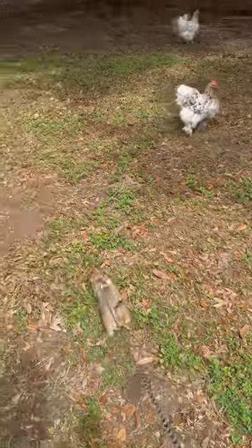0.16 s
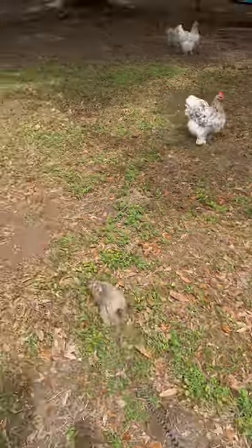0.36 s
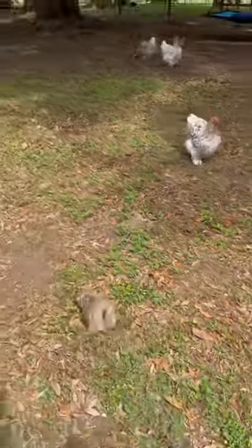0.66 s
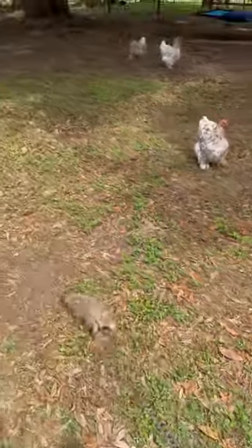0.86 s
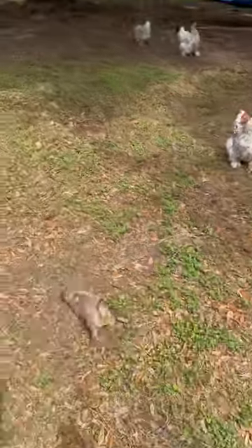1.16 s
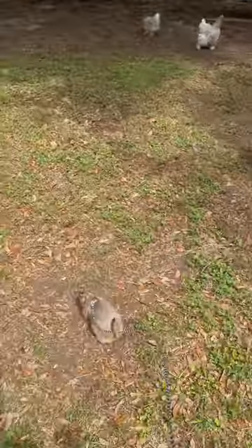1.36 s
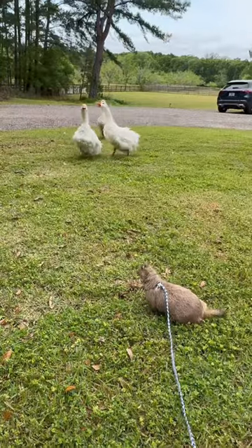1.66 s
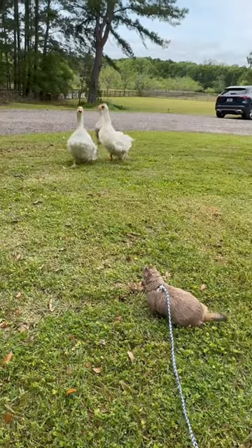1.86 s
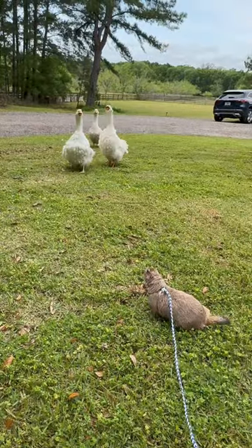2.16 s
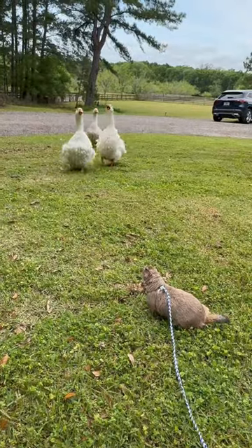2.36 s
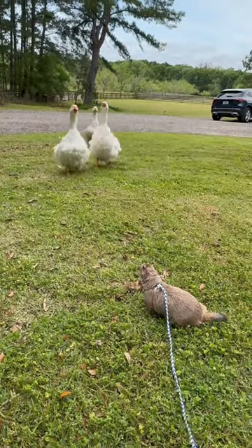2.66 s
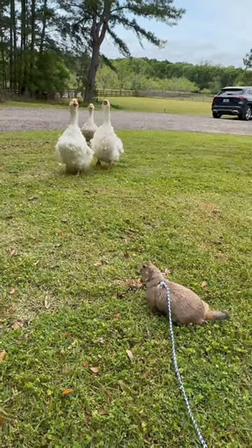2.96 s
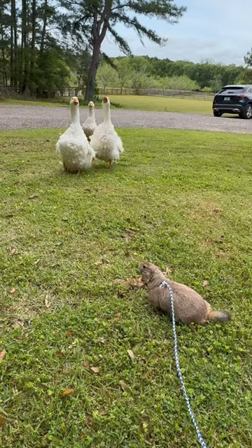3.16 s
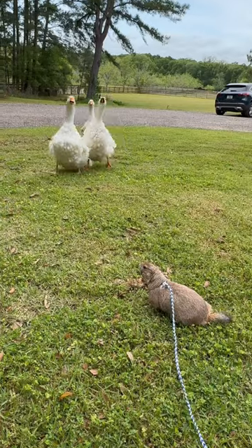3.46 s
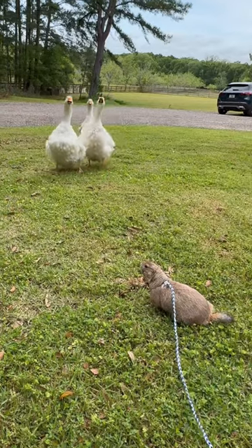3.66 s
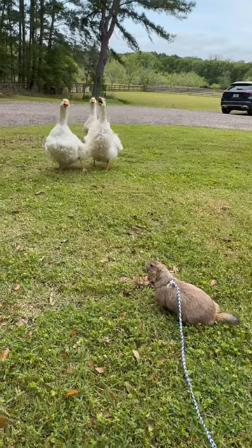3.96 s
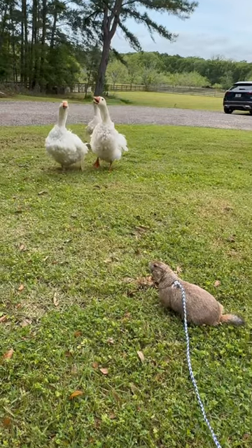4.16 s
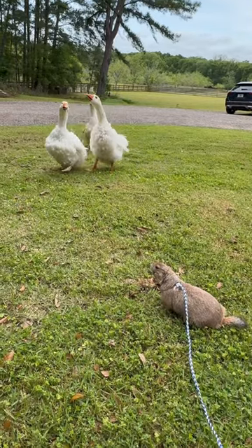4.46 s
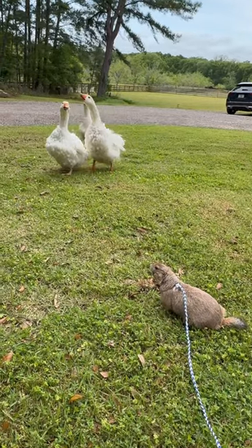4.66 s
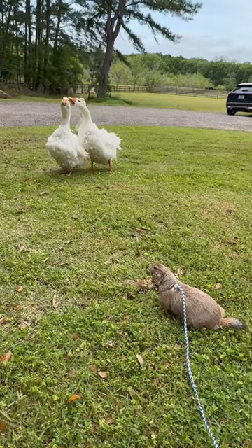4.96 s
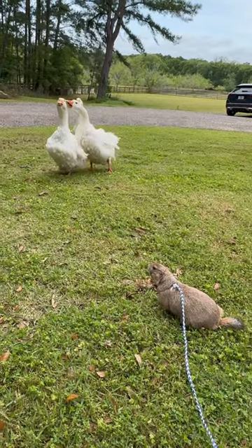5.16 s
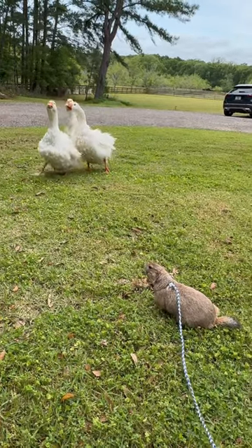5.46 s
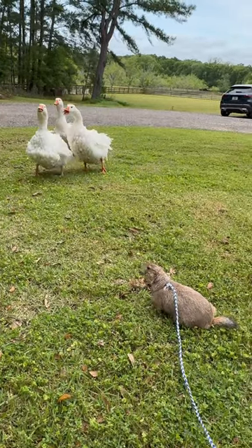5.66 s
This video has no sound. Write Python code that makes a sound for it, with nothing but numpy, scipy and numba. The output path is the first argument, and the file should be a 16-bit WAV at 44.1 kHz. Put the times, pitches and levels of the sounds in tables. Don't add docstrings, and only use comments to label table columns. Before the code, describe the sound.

Gentle ragged clucks, crackling leaves and a bassy wind buffet open the scene, with thin bird peeps just before the change. Then geese honk abruptly and loudly, first one bird, then another, harsh, brassy and cracking, with short gaps. The open-air sound is fairly dry, with faint echo from distant trees, soft grass rustle and even low rumble in the phone microphones.

```python
import sys
import numpy as np
from scipy import signal
from scipy.fft import rfft, irfft
from scipy.io import wavfile
from scipy.ndimage import uniform_filter1d
from numba import njit

SR = 44100
rng = np.random.default_rng(int(sys.argv[2]) if len(sys.argv) > 2 else 0)


def inscribe(sig):
    pcm = np.round(np.clip(np.atleast_2d(sig).T, -1, 1) * 32767)
    wavfile.write(sys.argv[1], SR, pcm.astype(np.int16))


def invert_db(level):
    return 10 ** (np.asarray(level, dtype=float) / 20)


N = 255780
T = np.arange(N) / SR
HZ = np.arange(N // 2 + 1) * SR / N + 1e-3
SECOND_BIRD_S = 2.52


def level(x, db=0):
    return x * invert_db(db) / np.sqrt(np.mean(x ** 2))


def noise():
    return rng.standard_normal(N)


def on_log(table):
    hz, value = np.transpose(table)
    return np.interp(np.log(HZ), np.log(hz + 1), value)


@njit
def svf(x, hz, width):
    y, b, l = np.empty(len(x)), 0., 0.
    for i in range(len(x)):
        g, k = np.tan(np.pi * hz[i] / SR), width / hz[i]
        v = (b + g * (x[i] - l)) / (1 + g * (g + k))
        b, l, y[i] = 2 * v - b, l + 2 * g * v, k * v
    return y


def ring(x, hz, width_hz):
    hz = np.clip(hz + 0 * T, 20, .45 * SR)
    return svf(svf(x, hz, 1. * width_hz), hz, 1. * width_hz)


def tone(hz):
    return np.sin(2 * np.pi * np.cumsum(hz) / SR)


def walk(rate):
    k = int(SR / rate)
    steps = np.repeat(rng.standard_normal(N // k + 1), k)
    return 1.3 * uniform_filter1d(uniform_filter1d(steps, k), k)[:N]


def pulses(hz, scatter_db, puff, puff_len):
    turns = np.cumsum(hz) / SR
    cycle = turns.astype(int)
    size = invert_db(scatter_db * rng.standard_normal(cycle[-1] + 1))[cycle]
    click = np.diff(cycle, prepend=0) * np.sqrt(SR / hz)
    breath = puff * np.exp(-(turns - cycle) / puff_len) * noise()
    return size * (click + breath), turns


def calls(rows, fade_s):
    s, length, *columns = np.array(sorted(rows)).T
    now = np.maximum(np.searchsorted(s - fade_s / 2, T) - 1, 0)
    age, left = T - s[now], (s + length)[now] - T
    gate = sum(np.clip(np.minimum(T - a, a + d - T) / fade_s + .5, 0, 1) for a, d in zip(s, length))
    return np.minimum(gate, 1), np.maximum(age, 0), np.maximum(left, 0), [c[now] for c in columns]


def peaks(spells, fall_db_s, floor_db):
    falls = [db - fall_db_s * np.maximum(np.maximum(a - T, T - b), 0) for a, b, db in spells]
    return np.max(falls + [floor_db + 0 * T], axis=0)


# start in seconds, length in seconds, level in dB, dB lost by the end, throat pitch in Hz.
GROWLS = [(1.406, 0.12, -19, 9, 1246), (1.651, 0.036, -21, -3.5, 1310),
          (1.833, 0.051, -17.5, -2, 1275), (2.042, 0.023, -26.5, -11.5, 1120),
          (2.118, .1, -20, 5, 1149), (2.268, 0.027, -18, 5, 1181), (2.336, 0.13, -19.5, 11.5, 1291),
          (2.576, .126, -25.5, 1.5, 1061), (2.891, 0.072, -26, 2, 1075),
                 (3.116, 0.039, -31, -2.5, 1136), (3.329, 0.02, -26, 15.5, 1162),
                 (3.344, 0.035, -22, -6, 1148), (3.45, 0.078, -23.5, -6.5, 1045),
                 (3.569, 0.057, -16, 2, 1119), (3.665, 0.071, -19.5, -1, 1056),
                 (3.776, 0.13, -17.5, 0, 1134), (3.978, .098, -17.5, 1.5, 1135),
                 (4.163, .095, -19.5, 8.5, 1164), (4.4, 0.039, -28.5, -0.5, 1232),
                 (4.602, 0.12, -27, 2, 1025), (4.794, 0.047, -20.5, 0.5, 1008),
                 (4.984, 0.1, -24.5, 8, 1055), (5.159, 0.084, -29, 17, 1127),
                 (5.605, 0.065, -20.5, 3.5, 1090), (5.72, 0.035, -19, 7, 1122)]
PURRS = [(1.511, 0.16, -23.5, 0.5, 1292), (1.884, 0.082, -21.5, 8.5, 1293), (3.915, 0.062, -24.5, 11, 1147),
         (4.081, 0.081, -28, 4.5, 1124), (4.838, 0.084, -28, 13, 1055)]
# start in seconds, length in seconds, pulse rate in Hz, level in dB.
CHEST_HUMS = [(1.403, 0.15, 182, -33), (1.563, 0.12, 182, -38.5), (1.86, .11, 184, -40),
              (2.14, 0.078, 190, -36), (2.36, 0.099, 180, -40), (2.63, 0.074, 182, -44),
              (2.94, .03, 204, -44), (3.35, 0.026, 180, -41.5), (3.45, .09, 180, -40),
              (3.61, 0.026, 185, -41.5), (3.7, .045, 176, -42), (3.78, 0.081, 188, -40.5),
              (3.88, 0.081, 178, -36.5), (3.982, 0.14, 180, -35.5), (4.17, 0.058, 206, -55.5),
              (4.65, .075, 180, -47.5), (4.795, 0.029, 199, -39.5), (4.985, .025, 204, -47.5),
              (5.2, 0.028, 203, -62.5), (5.61, .06, 177, -45), (5.73, 0.03, 205, -46.5)]
# pitch in Hz, width in Hz, level in dB for the first goose, level in dB for the second.
BEAK = [(1781, 39, -2.5, -7.5), (2363, 470, -15.5, -2), (2962, 500, 2.5, -4.5), (3602, 280, -13, -7.5),
        (4360, 530, -6.5, -13.5), (5780, 2030, -10.5, -9.5), (7180, 500, -14.5, -16), (9800, 3900, -10, -9)]
GROWL_SWELL_DB, GROWL_SWELL_S, FADE_CURVE = 5.5, 0.004, 1.94
THROAT_SAG, THROAT_WOBBLE = .12, .07
BRIGHT_DB, BURST_DB, BURST_S = -6, 5.5, 0.016
THIN_SHARE = .3
FIRST_ROUGH, LOUD_ROUGH, ROUGH_PER_DB = .53, .3, .025
PURR_EVEN = .65


def growl():
    rows = [(*r, 0) for r in GROWLS] + [(*r, 1) for r in PURRS]
    gate, age, left, (peak_db, fall_db, open_hz, purr) = calls(rows, .005)
    late = np.minimum(age / (age + left + 1e-9), 1) ** FADE_CURVE
    lost_db = fall_db * late
    throat_hz = open_hz * (1 + THROAT_SAG * (.4 - late) + THROAT_WOBBLE * walk(30))
    db = peak_db - lost_db - (1 - purr) * GROWL_SWELL_DB * np.exp(-age / GROWL_SWELL_S)
    bright_db = BRIGHT_DB + (1 - purr) * BURST_DB * np.exp(-age / BURST_S) + THIN_SHARE * lost_db
    first = T < SECOND_BIRD_S
    second_rough = np.clip(LOUD_ROUGH - ROUGH_PER_DB * (peak_db + 18) * (1 - purr), .15, .5)
    rough = np.where(first, FIRST_ROUGH, second_rough) * PURR_EVEN ** purr

    humming, _, _, (_, chest_db) = calls(CHEST_HUMS, 0.015)
    middles = [s + d / 2 for s, d, _, _ in CHEST_HUMS]
    hz = np.interp(T, middles, [f for _, _, f, _ in CHEST_HUMS])
    chest = humming * invert_db(chest_db + 2.0 + 4.0 * walk(40)) * np.sqrt(2) * tone(hz)

    slow, turns = pulses(hz * (1 + .07 * rough * walk(150)), 1.2, 2 * rough, .6)
    slow = slow / np.sqrt(1 + rough ** 2)
    fast = pulses(.5 * throat_hz * (1 + .035 * walk(300) + .025 * walk(20)), 1.5, .7, .7)[0]
    shaken = fast * np.exp(.7 * np.cos(2 * np.pi * turns)) * invert_db(1.5 * walk(60))
    buzz = shaken + .12 * slow
    slow = slow + .8 * np.roll(slow, 38) + .25 * shaken

    throat = level(ring(slow, throat_hz, 427))
    throat = throat + invert_db(-6.0) * level(ring(slow, 0.7716 * throat_hz, 255))
    throat = throat - invert_db(-21.5) * level(ring(shaken, .5 * throat_hz, 410))
    effort_db = 0.57 * (db + 18.5)
    beak = 0
    for k, (f, width, first_db, second_db) in enumerate(BEAK):
        beak_db = np.where(first, first_db, second_db) + effort_db * f / 8000 + 2.0 * walk(24.7)
        beak = beak + (-1) ** k * invert_db(beak_db) * level(ring(buzz, f * (1 + 0.045 * walk(10)), width))
    short_windpipe = 1 + np.minimum((520 / HZ) ** 6, 12)
    voice = irfft(rfft(level(throat) + invert_db(bright_db) * level(beak)) / short_windpipe, N)
    return gate * (invert_db(db) * voice + chest)


def trumpet(gate, hz, lows):
    phase = 2 * np.pi * np.cumsum(hz * (1 + .004 * walk(150))) / SR
    second_db, fourth_db = lows[1], lows[3]
    slope_db = 0.38 * fourth_db + 0.35 * second_db - 21
    highs = [slope_db - 2.31 * k + 2.6 * walk(12) for k in range(14)]
    partials = 0
    for k, db in enumerate(lows + highs, start=1):
        partials = partials + invert_db(db + 1.6 * walk(40)) * np.sin(k * phase + k * k)
    breath = level(ring(noise(), 300, 600))
    return gate * np.sqrt(2) * partials * (1 + .09 * breath)


# start in seconds, length in seconds, pitch in Hz, second partial in dB, fourth partial in dB.
HELD = [(1.448, 0.064, 635, -17, -26.5), (1.508, .07, 616, -41, -39), (2.05, 0.081, 599.7, -22.5, -27),
        (2.278, 0.076, 598, -21, -24), (2.594, 0.034, 580.7, -22.5, -24.5),
        (3.372, 0.0805, 584.4, -17, -27), (3.619, 0.054, 601.1, -16, -32), (4.618, .035, 562, -23.5, -37),
        (5.022, 0.042, 564, -24, -37)]
DROPPING = [
    (1.68, .075, 622, -19, -26.5),
    (2.695, .175, 579, -26, -43),
    (4.84, .09, 569, -27.5, -36),
]
CLIMBING = [
    (2.957, 0.09, 588, -26.5, -42),
    (3.154, .085, 569.1, -27.5, -41.5),
    (5.658, .085, 604.7, -18, -32),
]
TRAILING = [(3.833, .09, 622.1, -24.5, -29), (4.002, 0.084, 592, -19, -33.5),
            (4.164, .055, 596.7, -18, -26.5), (4.42, .065, 574.4, -28, -36),
            (5.178, 0.056, 565.4, -29, -48)]
RISE_PER_S, CLIMB_PER_S, SETTLE_PER_S = .15, .45, -.1
DROP_SHARE, DROP_S, DROP_DB = .19, .027, 14
SAG_SHARE, SAG_S, SAG_DB = .07, 0.048, 3
NOTE_SWELL_DB, NOTE_SWELL_S = 2, 0.024
THIRD_DB, THIRD_FOLLOWS, UPPER_FADE = -33.5, 0.18, 1.4
FIRST_HONK_THIRD_DB, FIRST_HONK_END_S = 9, 1.8


def notes():
    drop, sag = (DROP_SHARE, DROP_S, DROP_DB), (SAG_SHARE, SAG_S, SAG_DB)
    rows = [(*r, RISE_PER_S, 0, 1, 0) for r in HELD]
    rows += [(*r, SETTLE_PER_S, *drop) for r in DROPPING]
    rows += [(*r, CLIMB_PER_S, *drop) for r in CLIMBING]
    rows += [(*r, 0, *sag) for r in TRAILING]
    gate, age, left, (hz, second_db, fourth_db, rise, share, end_s, end_db) = calls(rows, .012)
    ending = np.clip(1 - left / end_s, 0, 1) ** 2
    lost_db = end_db * ending + NOTE_SWELL_DB * np.exp(-age / NOTE_SWELL_S)
    third_db = THIRD_DB + THIRD_FOLLOWS * (second_db + 21.5) + FIRST_HONK_THIRD_DB * (T < FIRST_HONK_END_S)
    climb = rise * np.clip(age - left, -.3, .3) / 2
    lows = [second_db - 18.5 - lost_db, second_db - lost_db]
    lows += [third_db - UPPER_FADE * lost_db, fourth_db - UPPER_FADE * lost_db]
    return gate, hz * (1 + climb - share * ending), lows


# start in seconds, length in seconds, pitch in Hz, third partial in dB, fourth partial in dB.
BREAKS = [
    (1.403, 0.053, 292.2, -30, -25.5),
    (3.46, 0.032, 272, -33, -14),
    (5.719, 0.027, 285.8, -27, -28),
]
# start in seconds, length in seconds, pitch in Hz, level in dB.
SHRILL = (4.215, .075, 910, -25)
BREAK_LOWS_DB = -54.5
SHRILL_DROP, SHRILL_DROP_S, SHRILL_DROP_DB, SHRILL_SWELL_DB = .23, .075, 22, 5


def others():
    rows = [(s, d, f, BREAK_LOWS_DB, d3, d4, 0) for s, d, f, d3, d4 in BREAKS]
    rows += [(*SHRILL, SHRILL[3], SHRILL[3] - 3, 1)]
    gate, age, left, (hz, low_db, third_db, fourth_db, shrill) = calls(rows, .012)
    ending = shrill * np.clip(1 - left / SHRILL_DROP_S, 0, 1)
    lost_db = SHRILL_DROP_DB * ending ** 2 + shrill * SHRILL_SWELL_DB * np.exp(-age / 0.0095)
    lows = [db - lost_db for db in (low_db, low_db, third_db, fourth_db)]
    return gate, hz * (1 - SHRILL_DROP * ending), lows


# time in seconds, peak level in dB.
RASPS = [(1.4146, -36.5), (1.4591, -29), (1.84, -37.5), (2.2744, -59.5), (2.909, -33), (3.3474, -51),
         (3.5727, -26.5), (3.779, -23), (3.985, -49.5), (5.613, -57.5)]


def rasp():
    hiss = level(ring(noise(), 14000, 8200))
    return hiss * sum(invert_db(db + 6.0) * (T >= s) * np.exp(-np.abs(T - s) / 0.0091) for s, db in RASPS)


# start in seconds, peak level in dB, throat pitch in Hz.
CLUCKS = [(0.15, -34.5, 890), (0.373, -34, 900), (0.58, -31, 850), (0.798, -32, 860), (1.015, -31.5, 870),
          (1.224, -31, 810)]


def hens():
    source = pulses(205 * (1 + 0.054 * walk(100)), 5.5, 0.87, 0.47)[0]
    out = np.zeros(N)
    for s, db, hz in CLUCKS:
        age = np.maximum(T - s, 0)
        swell = np.clip(age / 0.02, 0, 1) * np.clip((.04 - age) / 0.0098, 0, 1)
        throat = level(ring(ring(source, hz, 500), hz, 700))
        overtone = invert_db(-22) * level(ring(source, 2.0 * hz, 500))
        out += invert_db(db - 4) * swell * (throat + overtone)
    return out


# start in seconds, length in seconds, pitch in Hz, level in dB.
PEEPS = [
    (0.95, 0.11, 7160, -41.5),
    (1.053, 0.089, 6950, -39.5),
    (1.143, 0.088, 6830, -37.5),
    (1.234, 0.073, 6930, -38),
    (1.304, 0.11, 6705, -41.5),
    (5.783, 0.074, 3940, -23.5),
]


def peeping_bird():
    out = np.zeros(N)
    for s, length, hz, db in PEEPS:
        age = np.clip(T - s, 0, 2 * length)
        glide = hz - 0.23 * hz * np.exp(-age / 0.0076) + 60 * walk(500)
        swell = np.sin(np.pi * np.minimum(age / length, 1) ** 0.92)
        out += invert_db(db + 3.0 * walk(120)) * swell * tone(glide)
    return out


# time in seconds, peak level in dB.
SNAPS = [(0.1275, -36), (0.167, -37.5), (0.225, -33), (0.3247, -29.5), (0.4736, -28.5), (0.6461, -36.5),
         (0.7315, -26), (0.9003, -31), (0.9705, -31), (1.033, -34), (1.222, -32.5), (1.331, -42.5)]


def snapping_grass():
    snap = level(ring(noise(), 10700, 28000))
    return snap * sum(invert_db(db - 1.5) * (T >= s) * np.exp(-np.abs(T - s) / 0.0036) for s, db in SNAPS)


# start in seconds, end in seconds, pitch in Hz, level in dB.
WHINES = [
    (.7, 1.22, 775, -57),
    (1.2, 1.4, 2550, -71),
]


def far_tones():
    out = np.zeros(N)
    for t0, t1, hz, db in WHINES:
        gate = np.clip(np.minimum(T - t0, t1 - T) / 0.015, 0, 1)
        out += invert_db(db + 1.4 * walk(22.0)) * gate * np.sin(2 * np.pi * hz * T)
    return out


# pitch in Hz, lead in radians.
LEAD = [(0, 0), (860, -0.0), (1120, 0.7), (1550, 0.9), (2240, 0.4), (3270, 0.4), (4050, -0.2), (4820, -0.9),
        (5680, -0.3), (7060, -1.3), (8440, -1.9), (9730, -3.0), (14400, -3.3), (16100, -3.9)]
# pitch in Hz, left minus right in dB.
TILT = [(60, 0), (380, -1), (600, -9), (900, -7.5), (1290, -1.5), (2380, 1.5), (4400, .5), (15000, 0)]


def ports(x):
    half = np.sqrt(invert_db(on_log(TILT))) * np.exp(.5j * on_log(LEAD))
    return np.array([irfft(rfft(x) * half, N), irfft(rfft(x) / half, N)])


# start in seconds, end in seconds, level in dB.
RUSTLE = [
    (0, 1.1, -3.5),
    (.4, .5, 3),
    (3.2, 4.3, -6.5),
    (5.4, 5.8, 4.5),
]
# pitch in Hz, level in dB per Hz.
AIR = [(15, -38), (25, -8.5), (124, 0), (522, -7), (1120, -8), (1920, -10.5), (2660, -13), (6870, -11),
       (10600, -5.5), (12100, -107), (13500, -13), (15100, 1), (16400, -49)]
AIR_DB, RUSTLE_FALL_DB_S, STILL_DB = -53.5, 54, -12


def air():
    rustle_db = peaks(RUSTLE, RUSTLE_FALL_DB_S, STILL_DB)
    shared, own = noise(), rng.standard_normal((2, N))
    apart = np.clip(np.minimum(HZ / 500, 4000 / HZ), .03, .8)
    field = rfft(ports(shared)) * np.sqrt(1 - apart ** 2) + rfft(own) * apart
    field = field * invert_db(on_log(AIR))
    out = 0
    for hz in 25 * 2 ** np.arange(0, 9.6, .5):
        band = irfft(field * np.clip(1 - np.abs(np.log2(HZ / hz)) * 2, 0, 1), N)
        follows = min(hz / 1600, 1) + (hz > 9000)
        out = out + band * invert_db(follows * rustle_db + 3.1 * walk(27))
    return out * invert_db(AIR_DB) / np.std(irfft(field * (HZ < 2000), N))


# time in seconds, rumble in dB, buffeting in dB.
GUSTS = [(.04, -33.5, -65), (.17, -29.5, -56), (0.281, -20.5, -59), (.395, -18.5, -22.5),
         (0.426, -17.5, -29), (0.458, -22.5, -30), (.545, -26, -48.5), (0.735, -32, -39.5), (.86, -37, -43),
         (.92, -31.5, -38), (.97, -39, -43), (1.275, -37, -42)]
RUMBLE_FALL_DB_S, LULL_DB = 170, -48
BUFFET_FALL_DB_S, BUFFET_LULL_DB = 550, -57
STEADY_S, STEADY_RUMBLE_DB = 1.4, -43.5


def wind():
    rumble_db = peaks([(s, s, db) for s, db, _ in GUSTS], RUMBLE_FALL_DB_S, LULL_DB)
    buffet_db = peaks([(s, s, db) for s, _, db in GUSTS], BUFFET_FALL_DB_S, BUFFET_LULL_DB)

    def gusts():
        rumble = invert_db(rumble_db) * level(ring(noise(), 74, 66))
        buffet = level(ring(ring(noise(), 126, 325), 223, 450))
        return rumble + invert_db(buffet_db + 4.3 * walk(25.0)) * buffet

    mid, side = gusts(), gusts()
    gusty = mid + invert_db(-19) * side * np.array([[1], [-1]])
    steady = invert_db(STEADY_RUMBLE_DB + 1.5 * walk(6)) * level(ring(noise(), 76, 50))
    return (T < STEADY_S) * gusty + (T >= STEADY_S) * steady


def scene():
    geese = growl() + trumpet(*notes()) + trumpet(*others()) + rasp()
    voices = geese + hens() + peeping_bird() + snapping_grass() + far_tones()
    age = T[:SR // 2]
    lawn = rng.standard_normal((2, len(age))) * 1000 ** (-age / .03) * (age > .001)
    tail = rng.standard_normal((2, len(age))) * 1000 ** (-age / .5) * (age > .02)
    near = signal.fftconvolve(ring(voices, 3950, 12000)[None], lawn, axes=1)[:, :N]
    trees = signal.fftconvolve(ring(voices, 1200, 11000)[None], tail, axes=1)[:, :N]
    return ports(voices) + invert_db(-24) * near + invert_db(-48) * trees + air() + wind()


def band_limit(x):
    return signal.sosfilt(signal.butter(12, 16510, fs=SR, output="sos"), x)


def record(dry):
    rounded = np.tanh(0.85 * dry) / .8
    top_cut = signal.ellip(8, .2, 70, 16300, fs=SR, output="sos")
    return band_limit(signal.sosfilt(top_cut, rounded))


dry = scene()
out = record(dry)
inscribe(out)
```